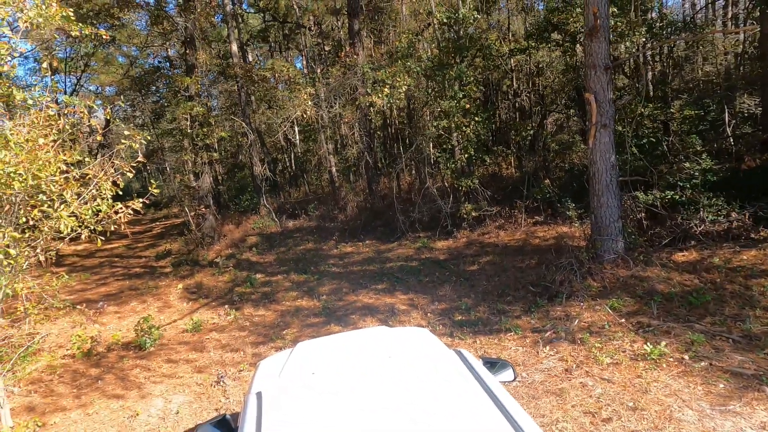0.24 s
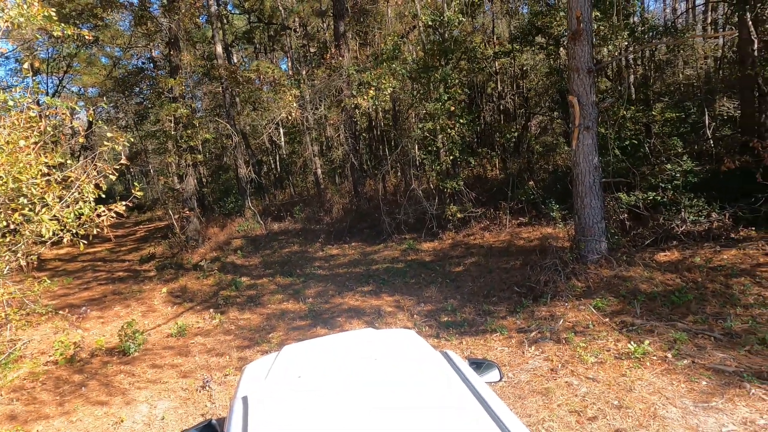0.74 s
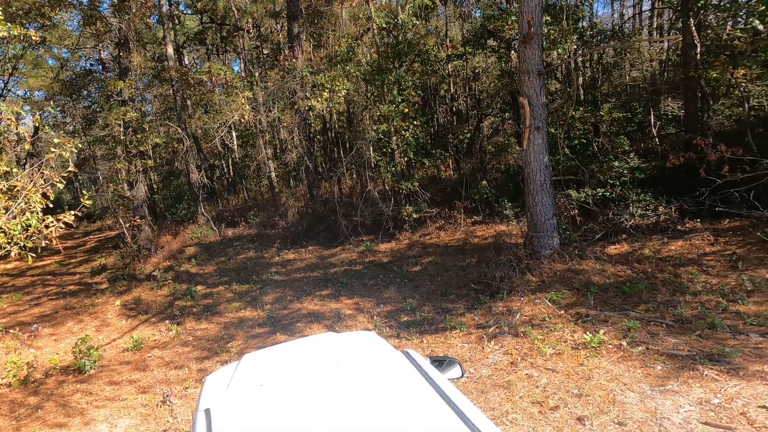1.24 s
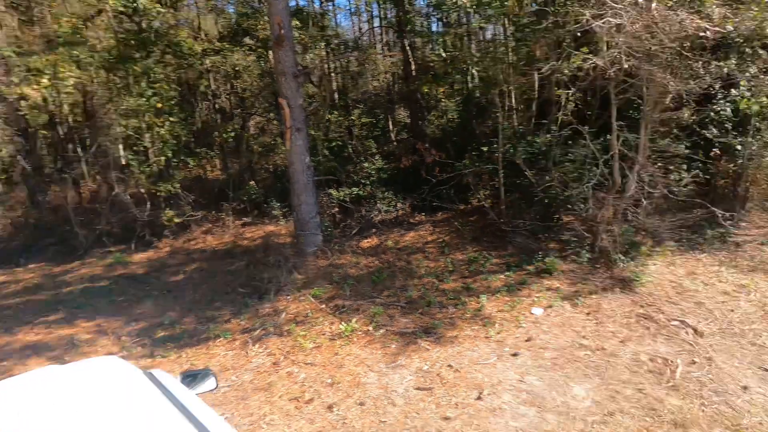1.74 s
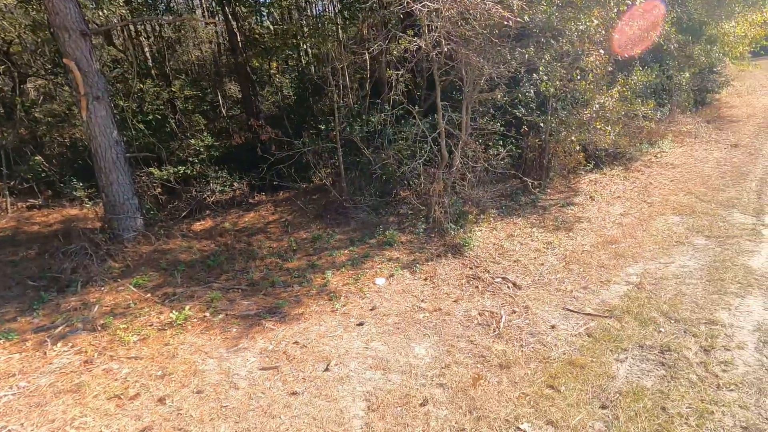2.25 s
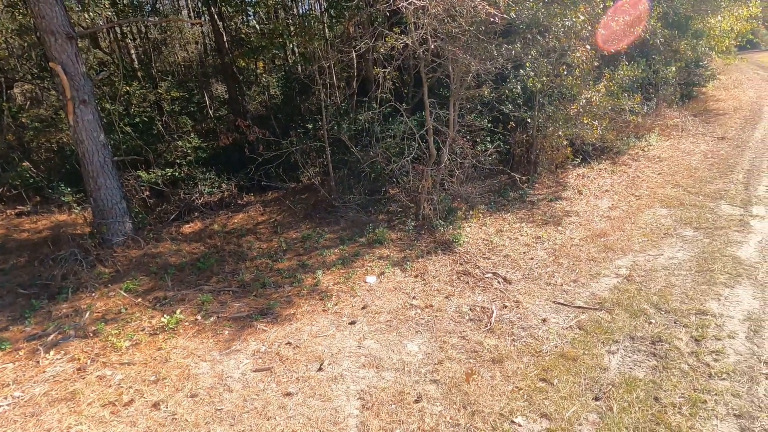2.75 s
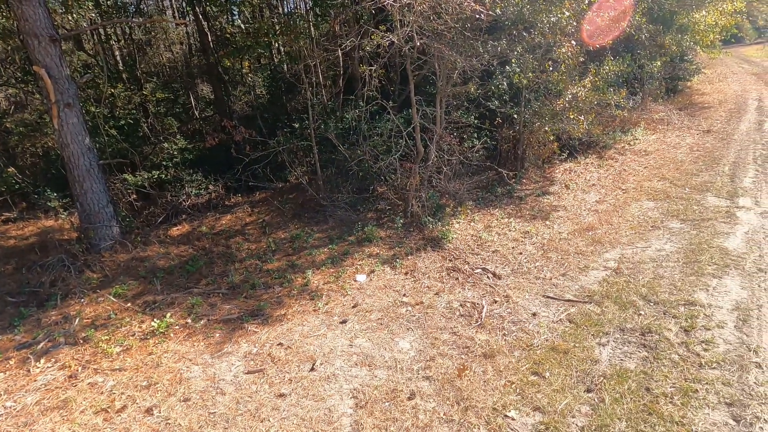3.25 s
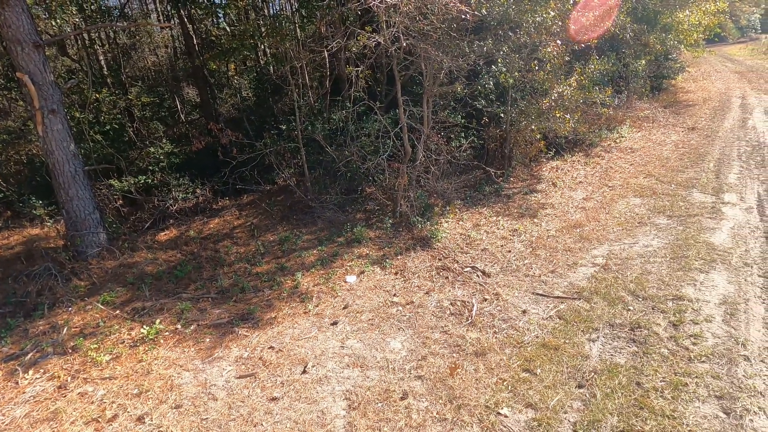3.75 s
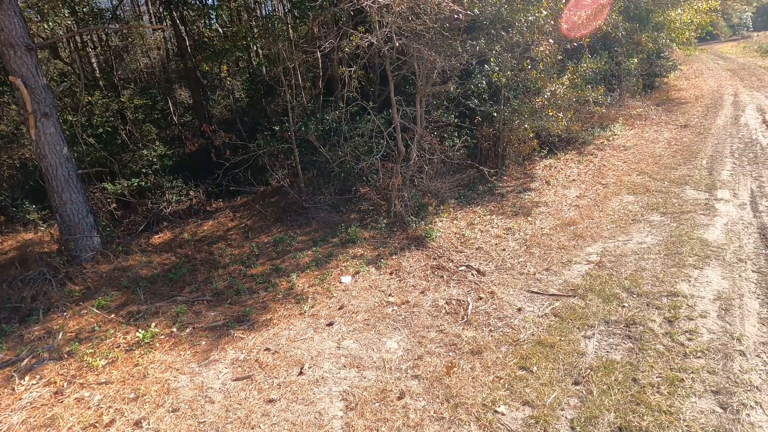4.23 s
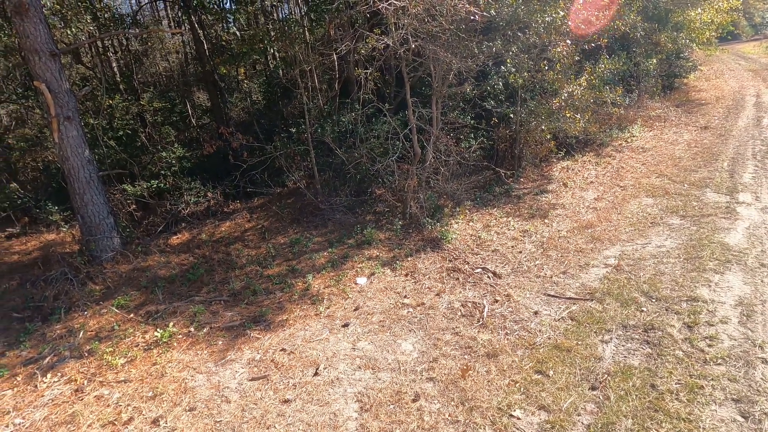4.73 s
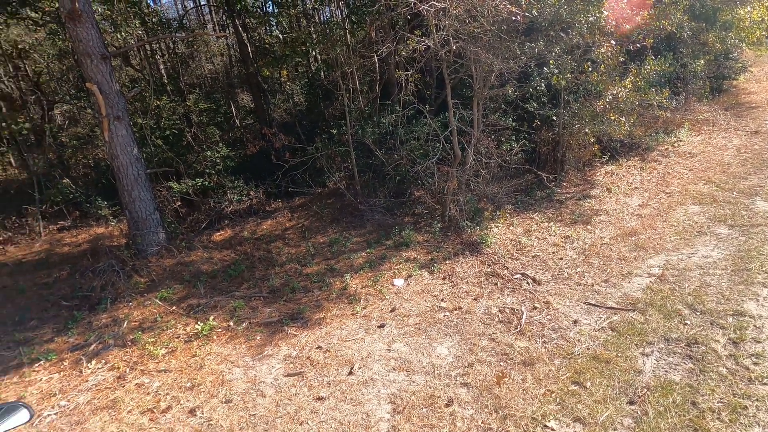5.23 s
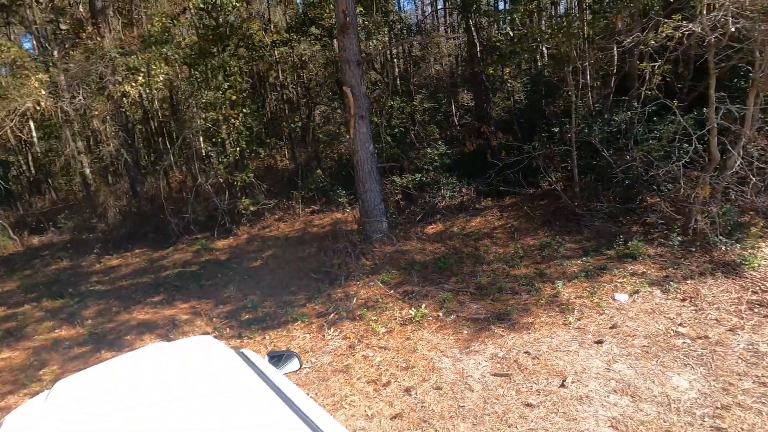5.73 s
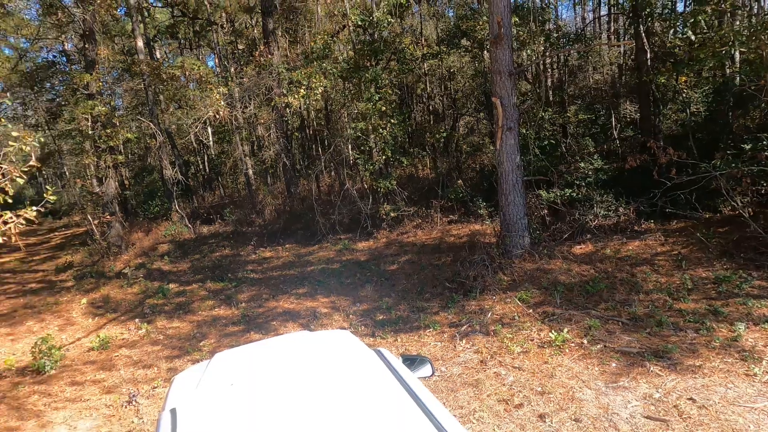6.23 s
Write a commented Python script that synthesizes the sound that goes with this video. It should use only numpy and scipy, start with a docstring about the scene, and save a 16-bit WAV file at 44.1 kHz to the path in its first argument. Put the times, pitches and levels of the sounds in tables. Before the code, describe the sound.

Outdoors at the edge of pine woods, a dying echo of far hounds opens the scene under a steady cricket trill, ticking and chirping insects and a raspy katydid buzz. After a lull with only very faint calls, a series of short yelps breaking into hoarse bays rings among the trees, then pauses and resumes near the end. Light wind and a low drone lie beneath, with soft bumps and rustles near the handheld microphone.

```python
"""In pine woods, hounds bay far off: each call whines, steps up to a yelp, breaks into a hoarse bay and rings on.
The calls come from a rough voice model, sent straight and through scattered echoes among the trees.
Crickets and a buzzing katydid are made of wing strokes; most get quieter as the microphone turns away and back.
Coloured noise makes leaf air, a distant low drone and light wind; short tones and noise make bumps and rustles.
"""
import sys
import numpy as np
from scipy import signal
from scipy.fft import rfft, irfft
from scipy.io import wavfile

SR = 44100
rng = np.random.default_rng(int(sys.argv[2]) if len(sys.argv) > 2 else 0)


def materialize(psi):
    """Save the field psi as 16-bit PCM at rate SR to the path in sys.argv[1].

    A 1-D psi becomes a single channel; in a 2-D psi each row is a channel.
    """
    bounded = np.clip(np.atleast_2d(psi).T, -1, 1)
    quanta = np.round(bounded * 32767).astype(np.int16)
    wavfile.write(sys.argv[1], SR, quanta)


N = 285768
TIME = np.arange(N) / SR


def gain_of(db):
    """Turns decibels into an amplitude factor."""
    return 10 ** (np.asarray(db) / 20)


def evened(x):
    """Scales a sound to an rms (average strength) of 1."""
    return x / np.sqrt(np.mean(x ** 2) + 1e-20)


def read(points, hz):
    """Reads a curve between its points, with pitch on a log scale."""
    point_hz, value = np.transpose(points)
    return np.interp(np.log(hz + 1), np.log(point_hz + 1), value)


def level(curve, t=TIME):
    """Gain over time along a curve of (time_s, level_db)."""
    return gain_of(np.interp(t, *np.transpose(curve)))


def placed(left_db):
    """Gains of left and right for a level difference between them, steady or moving."""
    return gain_of(np.array([[1], [-1]]) * left_db / 2)


def add(mix, s, sound):
    """Mixes a sound in, starting at time s in seconds."""
    part = mix[max(round(s * SR), 0):][:len(sound)]
    part += sound[:len(part)]


def wander(size, hz):
    """Smooth random drift of rms about 1, roughly as fast as hz."""
    long_size = size + SR
    f = np.fft.rfftfreq(long_size, 1 / SR)
    spectrum = rfft(rng.standard_normal(long_size)) * np.exp(-(f / hz) ** 2)
    return evened(irfft(spectrum))[:size]


def progress(length):
    """Runs from 0 to 1 over a length in seconds."""
    return np.linspace(0, 1, max(round(length * SR), 16))


def noise(spectrum, same):
    """Stereo noise of rms 1; same sets how alike the channels are, besides a phase lead on the left."""
    # how far the left channel leads: pitch_hz, lead_radians
    lead_phase = [(0, -0.26), (1300, 0), (2150, -0.68), (3450, -1.16), (4220, -0.097), (6000, -0.77),
                  (15000, 0.43)]
    hz = np.fft.rfftfreq(N, 1 / SR)
    same = np.clip(same, 0, 1)
    left, other = rfft(rng.standard_normal((2, N)))
    right = same * left + np.sqrt(1 - same ** 2) * other
    right = right * np.exp(-1j * read(lead_phase, hz))
    coloured = np.array([left, right]) * gain_of(read(spectrum, hz))
    return evened(irfft(coloured, N))


def strokes(rate_hz, sharp, uneven):
    """Loudness of a train of rasping wing strokes (rms 1) whose rate drifts."""
    turns = np.cumsum(rate_hz * (1 + uneven * wander(N, 6.7))) / SR
    return evened(np.exp(sharp * np.cos(2 * np.pi * turns)))


def turned(t=TIME):
    """How far the microphone faces away from the insects at time t, 0 to 1."""
    # the turning of the microphone: time_s, share_turned (0-1)
    turning = [(1.5, 0), (2.05, 0.88), (5.2, 1), (6.1, 0.1)]
    return np.interp(t, *np.transpose(turning))


def woods(x, early_db, late_db, early_t60, same, onset=0.024):
    """Trunks scatter a cluster of echoes that builds up over the onset time (s), then a longer tail rings on."""
    # how long each pitch takes to die by 60 dB: pitch_hz, time_s
    ring_times = [(500, 4.4), (750, 3.55), (1300, 2.85), (2200, 1.92)]
    size = 3 * SR
    # random echoes, one sample in ten on average
    taps = rng.standard_normal((2, size)) * (rng.random((2, size)) < 1 / 10)
    same = np.clip(same, 0, 1)
    taps[1] = same * taps[0] + np.sqrt(1 - same ** 2) * taps[1]
    # the late tail dies at a different speed for each pitch
    hz, t, bands = signal.stft(taps, SR, nperseg=512)
    decay = gain_of(-60 * t / read(ring_times, hz)[:, None])
    late = signal.istft(bands * decay, SR, nperseg=512)[1][:, :size]
    # the early cluster uses the echoes in reverse order
    t = np.arange(size) / SR
    early = taps[:, ::-1] * gain_of(-60 * t / early_t60)
    tail = gain_of(early_db) * early / np.linalg.norm(early[0])
    tail = tail + gain_of(late_db) * late / np.linalg.norm(late[0])
    tail = tail * np.minimum(t / onset, 1) ** 2
    return signal.fftconvolve(x[None], tail, axes=1)[:, :len(x)]


def voice(hz, partials, rough, jitter, shimmer=0.97, breathy=0.97):
    """Folds flap unevenly in pitch and strength; a puff of air each cycle rings in the throat."""
    # resonances of the throat: centre_hz, width_hz, level_db
    throat_peaks = [(706, 320, -0.5), (1044, 250, -2), (1265, 206, 2), (1610, 210, -10.5),
                    (1944, 610, -11.5)]
    size = len(hz)
    rough = np.clip(rough, 0, 1)
    turns = np.cumsum(hz * (1 + jitter * (0.29 + rough) * wander(size, 126))) / SR
    folds = np.zeros(size)
    for multiple, db in partials:
        folds += gain_of(db) * np.sin(2 * np.pi * (multiple * turns + rng.random()))
    folds *= np.exp(shimmer * rough * wander(size, 164))
    puffs = rng.standard_normal(size) * (1 + 0.49 * np.cos(2 * np.pi * turns))
    f = np.fft.rfftfreq(size, 1 / SR)
    throat = np.zeros(len(f))
    for centre, width, db in throat_peaks:
        throat += gain_of(db) / (1 + ((f - centre) / width * 2) ** 2) ** 2
    breath = irfft(rfft(puffs) * throat, size)
    breath_share = np.clip(breathy * rough, 0, 1)
    return np.sqrt(1 - breath_share) * evened(folds) + np.sqrt(breath_share) * evened(breath)


def yelp(length, top_hz, db, rough, octave_db):
    """A head-voice note that scoops up, swells and tips over."""
    u = progress(length)
    hz = top_hz * (1 - 0.08 * (1 - u / 0.734) ** 2)  # starts 8 % under its top
    swell = signal.windows.tukey(len(u), .3) * gain_of(4.5 * (u - 1.35))
    return gain_of(db) * swell * voice(hz, [(1, 0), (2, octave_db)], rough, jitter=0.026)


def bay(length, pitch_hz, db, fundamental_db, rough):
    """The voice breaks to a low arch; the throat favours its octave, and strong-weak cycles add half lines."""
    u = progress(length)
    hz = pitch_hz * (1.016 - .22 * (u - .45) ** 2)
    # multiple of the pitch, level in dB against the octave
    partials = [(1, fundamental_db), (3 / 2, -17), (2, 0), (5 / 2, -24), (3, -25)]
    shape = signal.windows.tukey(len(u), .55)
    return gain_of(db) * shape * voice(hz, partials, rough, jitter=0.046)


def hounds(lead=1, flutter_db=1.5):
    """Whine, yelp and bay of each call, straight and through the trees; the first calls are already dying away."""
    # the hounds' calls, levels before the trees and the mix: break_s, whine_hz, whine_db,
    # yelp_length_s (up to the break), yelp_hz, yelp_db, yelp_roughness (0-1),
    # bay_length_s, bay_hz, bay_db, bay_fundamental_db (against its octave), bay_roughness (0-1)
    calls = [(-.42, 762, -43, 0.061, 832, -44, 0.4, 0.077, 659.6, -37, -1.5, 0.27),
             (-.11, 802, -43, .048, 1180, -41.5, 0.3, 0.081, 699.7, -39.5, -8, 0.23),
             (2.652, 1018, -33, .035, 1127, -30, 0.01, .036, 695.2, -33.5, -13.5, .06),
             (2.952, 881, -46, .036, 1024, -30.5, 0.03, .041, 673.7, -34, -13.5, 0.02),
             (3.267, 800, -45, .036, 1107, -41, 0.67, 0.058, 680.3, -39.5, -6, 0.17),
             (3.666, 804, -45.5, .028, 1052, -39, 0.33, 0.0502, 666, -32.5, -12, .06),
             (4.128, 789, -46, .026, 1129, -34.5, 0.13, 0.056, 658.2, -35.5, -9, .18),
             (5.838, 848, -57, .03, 891, -41.5, .25, 0.1374, 678.3, -41, -8.5, 0.21),
             (6.183, 822, -41.5, .028, 1047, -39, 0.27, 0.0547, 638.5, -36.5, -11.5, .2)]
    # a low yelp's octave stands out more: pitch_hz, octave_db
    octave_levels = [(890, -5.5), (1020, -21.5)]
    # hounds much deeper in the woods, levels before the trees and the mix: start_s, length_s, pitch_hz, level_db
    far_calls = [(.72, 0.16, 750, -61.5), (1.201, 0.13, 755, -63.5), (1.479, .15, 765, -65),
                 (1.959, 0.069, 1232, -62.5), (2.46, 0.06, 1286, -67)]
    whine_s, overlap_s = .032, .01  # whine and yelp each run on into the next note
    straight = np.zeros(N + lead * SR)  # begins lead seconds early, for the calls before the start
    for s, whine_hz, whine_db, yelp_s, yelp_hz, yelp_db, yelp_rough, *body in calls:
        breaks = s + lead
        whine = yelp(whine_s, whine_hz, whine_db, yelp_rough, octave_db=-17.5)
        add(straight, breaks - yelp_s - whine_s + overlap_s, whine)
        octave_db = read(octave_levels, yelp_hz)
        add(straight, breaks - yelp_s, yelp(yelp_s + overlap_s, yelp_hz, yelp_db, yelp_rough, octave_db))
        add(straight, breaks, bay(*body))
    for s, *details in far_calls:
        add(straight, s + lead, far_howl(*details))
    ring = woods(straight, early_db=-5, late_db=-2.5, early_t60=0.88, same=0.75)
    ring *= gain_of(flutter_db * wander(len(straight), 20))  # moving air makes the long paths flutter
    both = gain_of(-2.5) * straight + ring
    return placed(-1.3) * both[:, lead * SR:]


def chorus(count=20):
    """Many crickets trill near one pitch, each wing stroke a falling note; the farthest merge into a band of noise."""
    # colour of the farthest crickets: pitch_hz, level_db (per Hz)
    band_colour = [(2900, -53), (3350, -26.5), (3580, -16.5), (3780, -1.5), (4020, -2), (4200, -5.5),
                   (4420, -20.5), (4750, -27.5), (5400, -49.5)]
    singers = np.zeros((2, N))
    for pitch, speed, side, start in rng.random((count, 4)):
        stroke_rate = (40 + 16 * speed) * (1 + .03 * wander(N, 3))  # strokes per second
        stroke = (start + np.cumsum(stroke_rate) / SR) % 1  # 0 to 1 through each stroke
        hz = (3770 + 320 * pitch) * (1 - 0.054 * (stroke - .5))
        phase = 2 * np.pi * np.cumsum(hz) / SR
        singers += np.sin(np.pi * stroke) ** 2 * np.sin([phase, phase + 3 * (side - .4)])
    mix = gain_of(-3) * evened(singers) + noise(band_colour, same=0.36)
    loudness = gain_of(-50 - 0.72 * turned() + 0.5 * wander(N, 6.3))
    return placed(3 - 2.3 * turned()) * loudness * mix  # the turn also shifts it to the right


def katydid():
    """Rasping wing strokes in high noise on the left; the buzz swells and sinks, and falls as the microphone turns."""
    # colour of the buzz: pitch_hz, level_db (per Hz)
    buzz_colour = [(8500, -29), (10400, -7), (11200, -9), (11750, 3), (12150, 2.5), (12500, -3),
                   (13100, -9), (14000, -21), (15700, -26)]
    # swells added to the resting buzz, before the turn: peak_s, level_db
    buzz_swells = [(.37, -68), (1.13, -70), (1.95, -78), (6.26, -72.5)]
    rise_s, fall_s, rest_db, away_db = 0.21, 0.23, -76.5, -9
    loudness = gain_of(rest_db)
    for s, db in buzz_swells:
        distance = np.maximum((s - TIME) / rise_s, (TIME - s) / fall_s)
        loudness = loudness + gain_of(db) * np.exp(-distance)
    loudness = loudness * gain_of(away_db * turned())
    rasp = strokes(69, sharp=0.62, uneven=0.0088)
    return placed(16.6) * loudness * rasp * noise(buzz_colour, same=0.45)


def ground_crickets():
    """A high noise band that trills with fast, shallow wing strokes."""
    # colour of the trill: pitch_hz, level_db (per Hz)
    trill_colour = [(6300, -9), (7100, -2), (7700, 0.5), (8150, -2.5), (8500, 5.5), (8800, -3), (9800, -60)]
    loudness = gain_of(-66.4 - 0.7 * turned())
    return placed(2.6) * loudness * strokes(65, sharp=0.17, uneven=0.047) * noise(trill_colour, same=0.66)


def far_lisp():
    """A far insect lisps: a narrow high noise band in slow, uneven pulses."""
    lisp_colour = [(8700, -71), (9250, -3), (9500, -3), (10200, -58)]  # pitch_hz, level_db (per Hz)
    loudness = gain_of(-78 - 4 * turned())
    return placed(3.8) * loudness * strokes(4.45, sharp=1.3, uneven=0.24) * noise(lisp_colour, same=1.0)


def leaf_air():
    """Soft air in the leaves, as steady coloured noise."""
    # colour of the air: pitch_hz, level_db (per Hz)
    air_colour = [(20, -22), (150, -2), (300, 2.5), (450, -3.5), (800, -8.5), (1300, -8.5), (2000, -16),
                  (3000, -19), (6000, -20.5), (10000, -22.5), (12800, -26), (13800, -50), (15700, -57)]
    return placed(-1.9) * gain_of(-59.5) * noise(air_colour, same=0.31)


def far_drone(waver_db=1.6):
    """A far low drone: a narrow band of noise that wavers in level."""
    # colour of the drone: pitch_hz, level_db (per Hz)
    drone_colour = [(20, -60), (90, -36), (125, -13.5), (150, 0.5), (185, -0.5), (230, -7), (320, -22.5),
                    (600, -43), (2000, -90)]
    # level before the waver: time_s, level_db
    drone_curve = [(0, -58.5), (3.2, -60), (3.38, -56.5), (4.3, -53.5), (5.2, -56.5), (5.7, -58.5),
                   (6.48, -58)]
    loudness = level(drone_curve) * gain_of(waver_db * wander(N, 6.2))
    return placed(-3.0) * loudness * noise(drone_colour, same=0.82)


def wind():
    """Wind on the microphone: a low rumble that throbs about twice a second and gusts at random."""
    # colour of the rumble: pitch_hz, level_db (per Hz)
    wind_colour = [(5, -7.5), (25, 1), (50, -8), (90, -11.5), (130, -15.5), (250, -33.5), (700, -54),
                   (2000, -100)]
    # level before throbs and gusts: time_s, level_db
    wind_curve = [(0, -58.5), (1.2, -57), (2.2, -51), (3.3, -56.5), (4.1, -53.5), (4.75, -60), (5.7, -54.5),
                  (6.48, -57)]
    every_s, peak_s = .498, .02
    throb_db = 3.5 * np.cos(2 * np.pi * (TIME - peak_s) / every_s)
    gust_db = 2.2 * wander(N, 8.4)
    loudness = level(wind_curve) * gain_of(throb_db + gust_db)
    return placed(-1.1) * loudness * noise(wind_colour, same=0.81)


def small_cricket(hz=7290, arch=0.234, back_db=-8, gap_s=0.02, away_db=-7, uneven_db=1.2):
    """About eight arched ticks a second, each with a weaker back stroke; the grass scatters them a little."""
    # even runs of ticks: first_tick_s, last_tick_s, rate (about this many ticks per second)
    tick_runs = [(0.079, 1.469, 7.9), (1.621, 2.416, 7.6), (2.541, 4.659, 8), (5.266, 5.756, 8.1),
                 (5.913, 6.434, 7.7)]
    out = np.zeros((2, N))
    u = progress(0.027)
    for first, last, rate in tick_runs:
        for s in np.linspace(first, last, round((last - first) * rate) + 1):
            tick_db = -55.5 + away_db * turned(s) + uneven_db * rng.standard_normal()
            for delay, db in (0, 0), (gap_s, back_db):
                pitch = hz * (1 - arch * (u - .42) ** 2 + 0.008 * wander(len(u), 300))
                tone = np.sin(2 * np.pi * np.cumsum(pitch) / SR)
                stroke = gain_of(tick_db + db) * np.sin(np.pi * u) * tone
                for channel in out:
                    add(channel, s + delay, stroke)
                    add(channel, s + delay + 0.0031 * rng.random(), gain_of(-10) * stroke)
    return placed(7.4) * out


def near_cricket(hz=5680, fall=0.055, gap_s=.0235, loose_s=0.0022):
    """Two wing strokes a chirp slide down as the wings slow; the ground returns a quick echo to each side."""
    first_s, every_s = .213, .4646  # a steady beat, loosened a little
    out = np.zeros((2, N))
    u = progress(0.02)
    for beat in np.arange(first_s, N / SR, every_s):
        s = beat + loose_s * rng.standard_normal()
        for k in range(2):
            pitch = hz * (1 - fall * u ** 0.5 + 0.0024 * rng.standard_normal())
            tone = np.sin(2 * np.pi * np.cumsum(pitch) / SR)
            stroke = gain_of(-53) * signal.windows.tukey(len(u), .4) * tone
            for channel in out:
                add(channel, s + k * gap_s, stroke)
                add(channel, s + k * gap_s + 0.0024 * rng.random(), gain_of(-11.5) * stroke)
    return out + woods(out[0], early_db=-17, late_db=-30, early_t60=.15, same=.4)


def bumps():
    """Dull bumps close by, each a short low tone that swells and fades."""
    # soft bumps: centre_s, length_s, pitch_hz, level_db
    bump_list = [(.53, 0.039, 154.4, -47), (1.982, .1, 79, -48.5), (2.07, .07, 109, -49),
                 (2.738, 0.087, 76.1, -41.5), (3.005, .06, 102, -45.5), (3.045, 0.036, 84.5, -38.5),
                 (3.529, 0.087, 76.4, -47.5), (4.162, 0.057, 91, -53)]
    out = np.zeros(N)
    for s, length, hz, db in bump_list:
        u = progress(length)
        tone = np.sin(2 * np.pi * (hz * length * u + rng.random()))
        add(out, s - length / 2, gain_of(db) * np.sin(np.pi * u) ** 2 * tone)
    return out


def rustles():
    """Brief dry rustles close by: bursts of noise with a rough, uneven level."""
    # dry rustles, level before the unevenness: centre_s, length_s, level_db
    rustle_list = [(0.552, 0.019, -64), (1.057, 0.024, -63), (1.074, 0.011, -61), (1.523, 0.057, -57),
                   (1.75, 0.013, -67), (6.287, .01, -63), (6.33, .01, -65)]
    # pitch_hz, level_db (per Hz)
    rustle_colour = [(1500, -9), (5000, 5), (9000, 0), (13000, -18), (15000, -46)]
    loudness = np.zeros(N)
    for s, length, db in rustle_list:
        u = progress(length)
        burst = gain_of(db + 2.7 * wander(len(u), 400)) * np.sin(np.pi * u)
        add(loudness, s - length / 2, burst)
    return placed(3.3) * loudness * noise(rustle_colour, same=0.93)


def far_howl(length, pitch_hz, db):
    """Distance leaves only the strongest partial of a wavering note."""
    u = progress(length)
    hz = pitch_hz * (1.01 - 0.1 * (u - .5) ** 2)
    shape = signal.windows.tukey(len(u), .6)
    return gain_of(db) * shape * voice(hz, [(0.98, 0)], rough=0.44, jitter=0.027)


def scene():
    """Hounds, insects, the open air and the small close sounds together."""
    insects = chorus() + katydid() + ground_crickets() + far_lisp() + small_cricket() + near_cricket()
    outdoors = leaf_air() + far_drone() + wind()
    return hounds() + insects + outdoors + bumps() + rustles()


def record(dry):
    """The recorder's band limit: a filter removes what lies above its edge."""
    edge_hz = 15700
    band_limit = signal.firwin(511, edge_hz, window=("kaiser", 9), fs=SR)
    return signal.oaconvolve(dry, band_limit[None], "same")


dry = scene()
out = record(dry)
materialize(out)
```